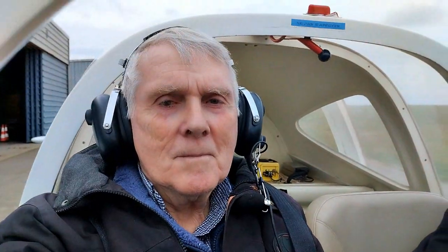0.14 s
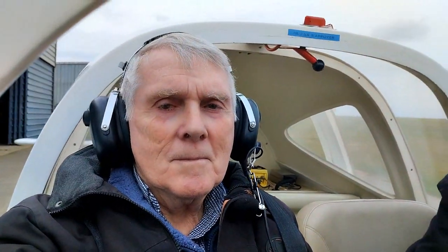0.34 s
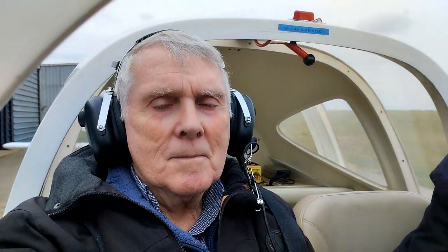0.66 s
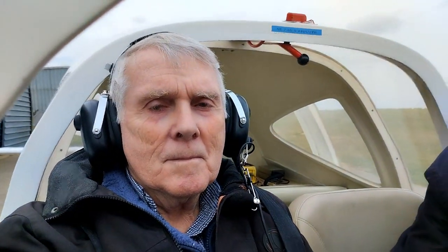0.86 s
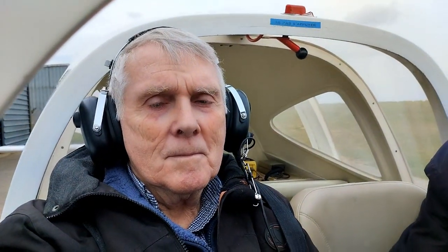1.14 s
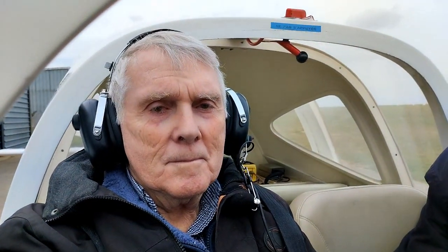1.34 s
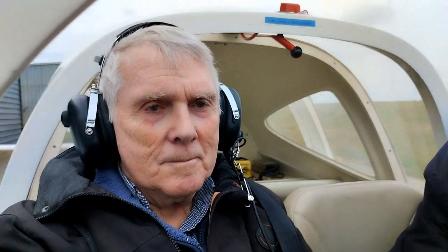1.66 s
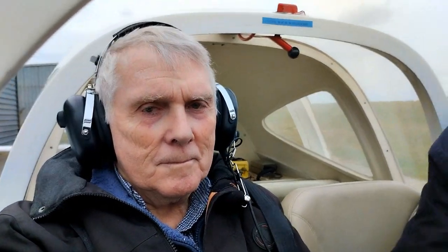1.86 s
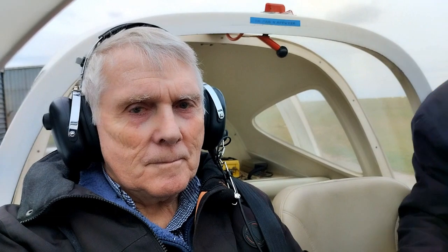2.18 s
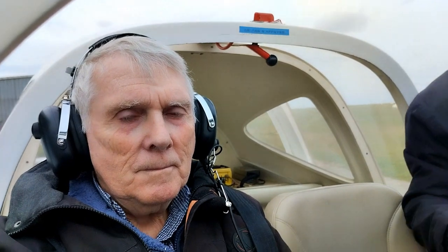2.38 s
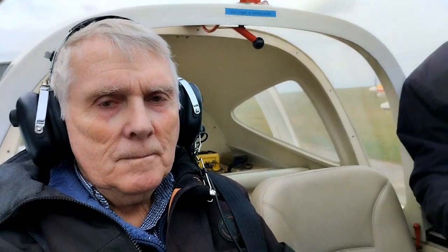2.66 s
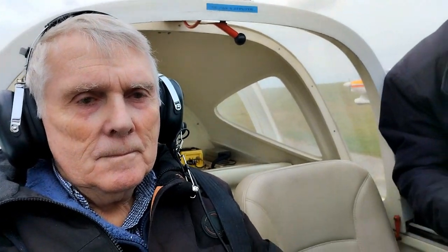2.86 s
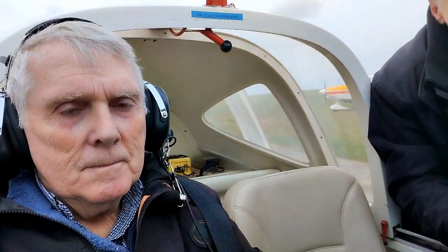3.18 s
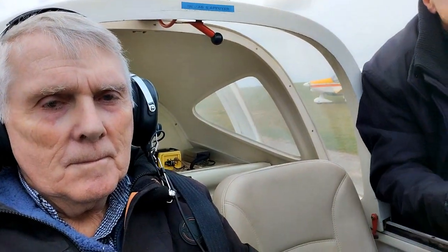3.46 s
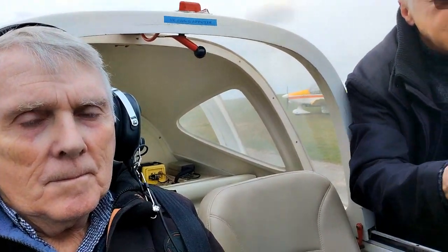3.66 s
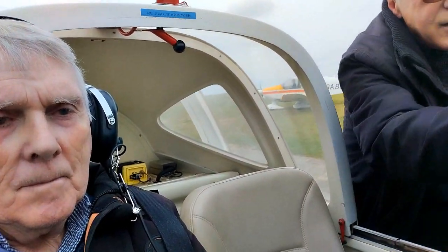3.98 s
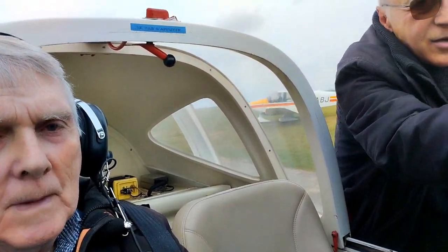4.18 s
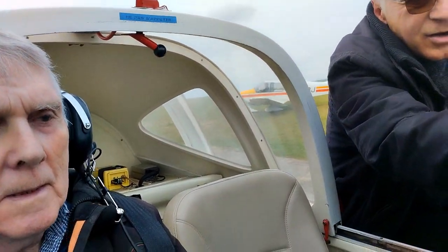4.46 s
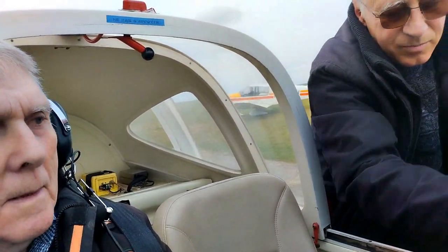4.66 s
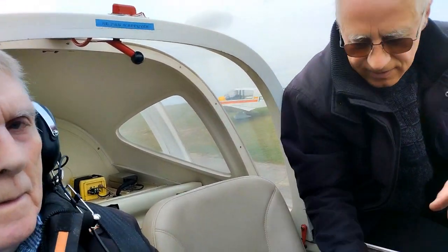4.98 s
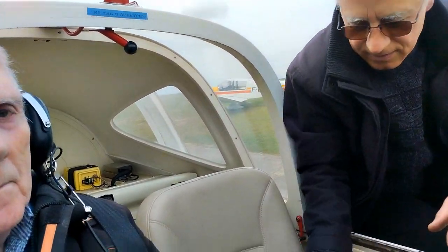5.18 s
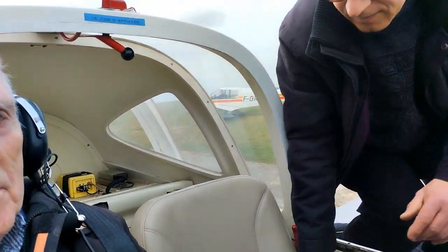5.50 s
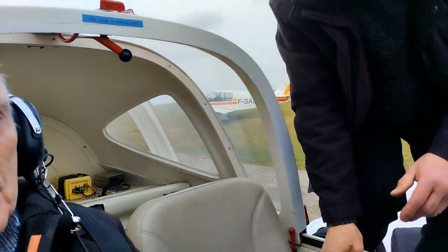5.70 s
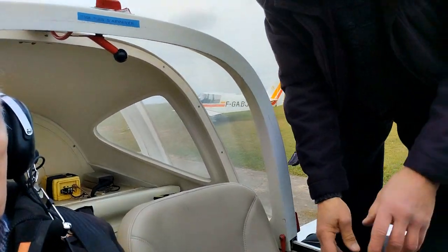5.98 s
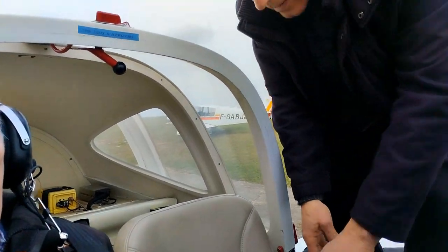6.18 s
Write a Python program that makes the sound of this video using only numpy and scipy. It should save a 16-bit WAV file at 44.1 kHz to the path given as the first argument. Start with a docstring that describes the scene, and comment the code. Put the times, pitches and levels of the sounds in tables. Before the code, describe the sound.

A handheld microphone in a parked aircraft's open cabin hears a deep fluttering engine idle, slightly fuller as it turns toward the opening. Fittings tick and chirp, a jacket brushes past, then a short run of massive thumps, cracks and rough scraping overloads the input. After a brief settling groan, light clicks and nylon rubbing continue over the engine, which revs up at the close.

```python
"""A four-cylinder propeller engine idles on an apron, heard from the open cockpit, and revs up at the end:
firing-order tones, filtered chuffs and throbbing noise. Fittings tick (noise bursts) and squeak (short tones),
the knocked cabin frame rings in decaying modes and nylon jackets swish close by as bright noise.
Something heavy slides and bangs on the frame, jolting rail resonances over a rumble,
until the microphone overloads and clips."""
import sys
import numpy as np
from scipy import signal
from scipy.fft import rfft, irfft, next_fast_len
from scipy.io import wavfile

SR = 44100
rng = np.random.default_rng(int(sys.argv[2]) if len(sys.argv) > 2 else 0)


def inscribe(sig):
    """Save sig as 16-bit PCM at rate SR to the path in sys.argv[1].

    A 1-D sig is mono; a 2-D sig holds one channel per row.
    Samples are clipped to [-1, 1] before scaling.
    """
    pcm = np.round(np.clip(np.atleast_2d(sig).T, -1, 1) * 32767)
    wavfile.write(sys.argv[1], SR, pcm.astype(np.int16))


N = 279594
TIME = np.arange(N) / SR

# Bright noise of rubbing nylon, also the grit of the slide. Each row: frequency in Hz, relative density in dB.
CLOTH_COLOUR = [(1500, -16), (3000, -9), (4500, -6.5), (7900, 2.5), (10500, -3), (13000, -9.5),
                (16000, -14)]


def from_db(db):
    """Decibels to gain."""
    return 10 ** (np.asarray(db) / 20)


def rms_one(x):
    """Scale to rms 1."""
    return x / np.sqrt(np.mean(x ** 2) + 1e-20)


def in_time(rows):
    """Columns of a breakpoint table joined by straight lines, sample by sample."""
    seconds, *columns = np.transpose(rows)
    return [np.interp(TIME, seconds, column) for column in columns]


def drift(rate):
    """Slow random wander with spread 1: low-passed noise, faster for a higher rate in Hz."""
    step = 40   # samples between the computed points
    r = np.exp(-2 * np.pi * rate * step / SR)
    raw = rng.standard_normal(N // step + 2002)
    slow = signal.lfilter([1], [1, -2 * r, r * r], raw)[2000:]   # drop the filter's run-in
    return np.interp(np.arange(N) / step, np.arange(len(slow)), rms_one(slow))


def colour(x, spectrum):
    """Shape a signal by a (Hz, dB) spectrum, straight over log frequency; rms 1."""
    hz, db = np.transpose(spectrum)
    size = next_fast_len(N)
    grid = np.maximum(np.arange(size // 2 + 1) * SR / size, 1)
    gain = from_db(np.interp(np.log(grid), np.log(hz), db))
    return rms_one(irfft(rfft(x, size) * gain, size)[:N])


def grainy(spectrum, flicker_db, rate):
    """Coloured noise whose loudness flickers; rms 1."""
    noise = colour(rng.standard_normal(N), spectrum)
    return rms_one(noise * from_db(flicker_db * drift(rate)))


def narrow(hz, width):
    """Noise in a resonance whose centre may move: two slow noises on a quadrature carrier; rms 1."""
    r = np.exp(-np.pi * width / SR)
    a, b = signal.lfilter([1], [1, -r], rng.standard_normal((2, N)))
    phase = 2 * np.pi * np.cumsum(hz * np.ones(N)) / SR
    return rms_one(a * np.cos(phase) + b * np.sin(phase))


def resonate(x, modes):
    """Parallel resonances (Hz, width Hz, dB) with alternating signs; rms 1."""
    out = 0
    for k, (hz, width, db) in enumerate(modes):
        r = np.exp(-np.pi * width / SR)
        poles = [1, -2 * r * np.cos(2 * np.pi * hz / SR), r * r]
        ringing = (1 - r * r) * signal.lfilter([1, 0, -1], poles, x)
        out = out + (-1) ** k * from_db(db) * ringing
    return rms_one(out)


def swell_db(start, end, growth_db, swell, fade):
    """Level against the start: a swell in dB per s, a hold that grows or sags, a fade in dB per s."""
    hold = growth_db * np.clip((TIME - start) / max(end - start, .001), 0, 1)
    edges = np.minimum(swell * (TIME - start), fade * (end - TIME))
    return hold + np.clip(edges, -120, 0)


def engine_tones(speed, angle, state):
    """Firing orders: tones locked to multiples of the firing phase, weakened where cabin and pipe cancel."""
    # Quarter orders come from unlike cylinders. Each row: order, starting level in dB rms before nulls and drift,
    # dB gained by the microphone turn, by the slide, by revving.
    orders = [(1, -41, 3.5, 1.5, 1), (2, -48, 12.5, 4, 4), (2.25, -44.5, -2.5, -5, 3),
              (2.5, -71, -22, -2, 0), (3, -47.5, 12.5, -4, 10), (4, -41.5, 2, 3, -5),
              (5, -47.5, 4.5, -1, 0.5), (5.25, -70, 12, 1, -5), (6, -43, -1.5, -4, 2.5),
              (7, -47.5, -9, -5, -14), (8.25, -67.5, 17.5, 1.5, -18)]
    # Cabin and pipe cancel orders passing here. Each row: frequency in Hz, half width in Hz, depth in dB.
    nulls = [(37.7, 1.67, 21), (126.3, 7.1, 14), (243, 13.5, 12.5)]
    # The sixth order swells and sinks. Each row: time in seconds, dB added.
    sixth_swell = [(.2, -1), (1.2, 4), (2.9, -3), (3.9, 1.0), (4.3, -3.5), (5.7, 2.5)]
    tones = 0
    for order, *db in orders:
        # phase jumps across the pipe's bass corner and its null near order 4
        lead = 0.9 if order < 1.6 or order > 4.4 else -1.2
        null_db = sum(depth_db * np.exp(-((order * speed - hz) / half_width) ** 2)
                      for hz, half_width, depth_db in nulls)
        level_db = db @ state - null_db + 1.05 * drift(2.7)
        if order == 6:
            level_db = level_db + in_time(sixth_swell)[0]
        tones = tones + np.sqrt(2) * from_db(level_db) * np.cos(order * angle + lead)
    return tones


def exhaust_chuffs(angle):
    """One impulse per firing, alternately strong and weak, sent twice through the exhaust stack; rms 1."""
    # Exhaust stack resonances. Each row: frequency in Hz, width in Hz, relative level in dB.
    stack = [(480, 130, -4), (565, 140, 0)]
    fired = np.diff(np.floor((angle - .1) / (2 * np.pi)), prepend=0) > 0
    strength = from_db(2.5 * np.cos(angle / 2) + 1.5 * drift(30))
    impulses = fired * strength + 1e-18   # the offset keeps the filters off vanishing numbers
    return resonate(resonate(impulses, stack), stack)


def engine_noise(angle, state):
    """Rasp, cowling resonances and cooling-air hiss: noises that throb with each firing."""
    # Broad rasp. Each row: frequency in Hz, relative density in dB.
    rasp_colour = [(25, 5.5), (60, 3), (130, 0), (250, 5), (330, -9.5), (450, -1.5), (560, -12), (680, -10),
                   (850, -15.5), (1200, -18), (1600, -17), (2300, -21.5), (2750, -36), (4000, -67),
                   (9000, -70)]
    # Cooling-air hiss. Each row: frequency in Hz, relative density in dB.
    hiss_colour = [(1500, -15), (3500, -2.5), (5500, -3.5), (8200, 2.5), (10500, -5.5), (13000, -11.5),
                   (16000, -18)]
    # Level of that hiss. Each row: time in seconds, level in dB.
    hiss_level = [(0, -51), (1.0, -50), (2.0, -49), (2.8, -51.5), (3.1, -49), (3.85, -59), (4.0, -48.5),
                  (4.4, -48), (5.1, -49.5), (5.7, -48.5), (5.9, -58)]
    # Cowling and cabin resonances. Each row: frequency in Hz, width in Hz, relative level in dB.
    cowling_modes = [(455, 150, -13.5), (511, 43, -1), (1026, 140, -15), (1437, 27, -9), (2760, 68, -17.5),
                     (3880, 33, -18)]
    # dB at first, dB gained by the turn, by the slide, by revving
    rasp_db, cowling_db = (-44, 2, 2.5, 5), (-56, 2.5, 1, 4.5)
    throb = np.cos(angle - .9)
    uneven = from_db(0.13 * np.cos(angle / 2) + 0.48 * drift(23))   # cylinders fire strong and weak

    def throbbing(depth_db):
        return rng.standard_normal(N) * from_db(depth_db * throb) * uneven

    rasp = colour(throbbing(0.35), rasp_colour)
    cowling = resonate(throbbing(4.3), cowling_modes)
    hiss = colour(throbbing(1.65), hiss_colour)
    return (from_db(rasp_db @ state) * rasp + from_db(cowling_db @ state) * cowling
            + from_db(in_time(hiss_level)[0]) * hiss)


def engine_whirrs(angle):
    """A gliding narrow whirr that throbs with the firings and a steadier whine above it, as narrow noise."""
    # Gliding whirr. Each row: time in seconds, centre in Hz, level in dB before the throb.
    whirr_glide = [(0, 1720, -60), (.6, 1820, -66.5), (1.2, 1559, -65), (2.1, 1589, -56), (2.9, 1696, -60),
                   (3.2, 1745, -51.5), (3.5, 1798, -57), (4.2, 1531, -60), (5.2, 1488, -63),
                   (5.32, 1478, -47), (5.55, 1480, -59), (5.75, 1441, -52), (5.85, 1456, -44),
                   (6.05, 1508, -51), (6.34, 1545, -50)]
    # Fainter whine above it. Each row: time in seconds, centre in Hz, level in dB.
    whine_glide = [(0, 2660, -70), (.7, 2636, -68), (1.5, 2800, -67), (2.3, 2880, -59), (3.0, 2830, -95),
                   (4.4, 2970, -80), (6.34, 2795, -63)]
    whirr_hz, whirr_db = in_time(whirr_glide)
    whine_hz, whine_db = in_time(whine_glide)
    whirr = from_db(whirr_db + 1.9 * np.cos(angle - .9)) * narrow(whirr_hz, width=80)
    return whirr + from_db(whine_db) * narrow(whine_hz, width=130)


def engine():
    """One firing phase drives the order tones, the chuffs, the noises and the whirr."""
    # Engine speed. Each row: time in seconds, firings per second.
    speed_curve = [(0.0, 31.72), (1.1, 31.92), (2.2, 32.08), (4.3, 32.22), (5.2, 32.48), (5.6, 32.42),
                   (5.72, 33.0), (5.88, 34.7), (6.09, 37.9), (6.25, 40.1), (6.34, 41.2)]
    # The microphone turns toward the open side of the cockpit. Each row: time in seconds, share of the turn 0-1.
    mic_turn = [(0, 0), (.7, 0.07), (1.6, 0.48), (2.5, 0.6), (3.4, 1), (4.3, 0.99)]
    moved_s, move_takes_s = 4.93, 0.38   # the slide changes what stands between engine and microphone
    idle_top_per_s, rev_rise_per_s = 32.6, 1.4   # revving starts above this firing rate, full this much higher
    chuff_db = (-60, 6, 9, -3)   # dB at first, dB gained by the turn, by the slide, by revving
    speed, = in_time(speed_curve)
    angle = 2 * np.pi * np.cumsum(speed) / SR - 1.64 + .03 * drift(4)   # one turn per firing
    moved = (TIME - moved_s) / move_takes_s
    revving = (speed - idle_top_per_s) / rev_rise_per_s
    # a row of four levels times this gives dB in time
    state = np.clip([np.ones(N), in_time(mic_turn)[0], moved, revving], 0, 1)
    chuffs = from_db(chuff_db @ state) * exhaust_chuffs(angle)
    return engine_tones(speed, angle, state) + chuffs + engine_noise(angle, state) + engine_whirrs(angle)


def cracks():
    """Ticks and cracks: bursts of bright noise with a duller body and a thin edge, sudden and dying fast."""
    # Each row: start in seconds, bright noise in dB, dull body in dB, thin edge in dB (both against the noise).
    hits = [(0.376, -49, -25, 5.5), (1.346, -44, 6, -25), (1.5944, -44, -15, -23), (1.9095, -34, -12, -6),
            (1.9442, -38.5, 0.5, -24), (2.031, -29, -5.5, -17), (2.042, -30.5, -5, -4),
            (2.978, -53, -15, -20), (3.59, -55, 11.5, -20), (3.621, -44, 2, -20), (3.649, -36, -20, -6),
            (4.4324, -56.5, 18, -14), (4.4631, -16, 5, -35), (4.5242, -20.5, 0.5, -2.5),
            (4.7347, -21, -10, 4), (4.757, -34, -12, -10), (4.8024, -36, -8, -9), (4.821, -34.5, -20, 2),
            (4.8426, -11.5, -9, -13), (4.8734, -18, 0.5, -4), (4.895, -23, -22, -6),
            (4.9235, -29.5, -20, -25), (5.0105, -48, -18, -21), (5.2241, -50.5, 12, -17),
            (5.2785, -52.5, 15.5, -18), (5.3587, -35, -22, -9), (5.3844, -34, 0, 1.5),
            (5.438, -40, -15, -17), (5.4962, -43, -23.5, 3.5), (5.5446, -48.5, -17, 6.5),
            (5.558, -46, -13, -23), (5.6325, -36, -2, -24), (5.723, -39.5, 8.5, -11),
            (5.802, -35.5, 7.5, 1), (5.8407, -30.5, -11, -16), (5.9135, -53, 17, -18),
            (6.0514, -41, -9, 3.5), (6.1814, -34, -2, -5), (6.274, -33.5, -17, -23)]
    # Bright noise, dull body, thin edge. Each row: frequency in Hz, relative density in dB.
    bright_colour = [(800, -3.5), (2000, 6.5), (3500, -7), (8000, 1.5), (10500, -4.5), (12500, -57)]
    body_colour = [(200, -15), (450, 6.5), (1000, -2), (1600, -29), (3000, -39)]
    edge_colour = [(9000, 3), (11500, 5.5), (16000, -14.5)]
    bright_t60_s, body_t60_s, edge_t60_s = 0.062, 0.11, 0.07   # for a crack at -25 dB
    shorter_per_db = 0.0071   # harder cracks die a little faster
    bright, dull, thin = np.zeros((3, N))
    for start, db, body_db, edge_db in hits:
        now = slice(round(start * SR), round(start * SR) + SR // 3)
        fall_db = 60 * (TIME[now] - start) * np.exp(shorter_per_db * (db + 25))
        bright[now] += from_db(db - fall_db / bright_t60_s)
        dull[now] += from_db(db + body_db - fall_db / body_t60_s)
        thin[now] += from_db(db + edge_db - fall_db / edge_t60_s)
    layers = [(bright, bright_colour), (dull, body_colour), (thin, edge_colour)]
    return sum(level * colour(rng.standard_normal(N), shade) for level, shade in layers)


def bumps():
    """Low bumps on the frame: each rings all its modes as decaying sines; a harder one lifts the high modes."""
    # Each row: start in seconds, level in dB, T60 in seconds, hardness in dB per decade above 100 Hz.
    knocks = [(1.345, -32, 0.097, 0), (1.912, -31, 0.22, 1), (2.04, -24, 0.36, 3.5),
              (4.465, -9.5, .07, 13.5), (4.476, 2, 0.11, -18), (4.539, -33, .14, -10),
              (4.728, -.5, 0.15, -16), (4.845, -7, 0.18, 5), (4.858, 1.5, 0.077, -20),
              (4.897, -9.5, 0.5, -3.5), (5.796, -29.5, 0.56, 4.5)]
    # Modes of the cabin frame. Each row: frequency in Hz, relative level in dB, share of the bump's T60.
    frame_modes = [(61.6, -15, 1), (100, 2, 0.55), (119.8, 3.5, 0.46), (208, 2, 0.62), (360, -8, 0.34),
                   (640, -25, 0.12), (1424, -16, 0.46), (2098, -16, 0.26)]
    out, after = np.zeros(N), TIME[:SR // 2]
    for start, db, t60, hard_db in knocks:
        ring = 0
        for hz, mode_db, share in frame_modes:
            strike_db = mode_db + hard_db * np.log10(hz / 100) + 1.8 * rng.normal()
            fall_db = 60 * after / (t60 * share)
            ring = ring + from_db(strike_db - fall_db) * np.sin(2 * np.pi * hz * after)
        first = round(start * SR)
        out[first:first + len(after)] += from_db(db) * ring
    return out


def squeaks():
    """Brief tones roughened by a waver in pitch and level: squeaks of fittings, near 2.05 s a tick's short ring."""
    # Each row: centre in seconds, pitch in Hz before the waver, level in dB before the flicker, length in seconds.
    chirps = [(1.688, 2160, -40, .012), (1.756, 2250, -39.5, 0.015), (1.851, 2290, -39, .01),
              (1.862, 2240, -39.5, .014), (1.88, 2260, -45, 0.024), (1.939, 1250, -39, 0.02),
              (1.969, 2230, -45, .015), (2.051, 2150, -24.5, 0.013), (2.047, 1580, -33, 0.016),
              (2.097, 2260, -42, .012), (2.291, 2880, -49, .056), (2.3, 3300, -50, 0.068),
              (5.863, 5970, -35.5, 0.06), (5.858, 14660, -32, 0.043)]
    out, waver = np.zeros(N), np.cumsum(drift(62)) / SR
    for centre, hz, db, length in chirps:
        shape = np.exp(-2 * ((TIME - centre) / (length / 2)) ** 2)
        out += from_db(db) * shape * np.sin(2 * np.pi * (hz * TIME + 30 * waver))   # pitch wavers by 30 Hz
    return out * from_db(3.6 * drift(76))


def jackets():
    """Nylon rubbing on nylon: bright noise under each stroke; the early swish also rings in a few narrow bands."""
    # Each row: start in seconds, end in seconds, level at the start in dB, growth in dB, fade in dB per second.
    strokes = [(3.175, 3.3, -46, 3.5, 100), (3.2, 3.223, -41.5, 0, 200), (3.3, 3.37, -44, 4, 31),
               (3.55, 3.745, -45.5, -2.5, 496), (5.34, 5.382, -50.5, 10, 300),
               (5.442, 5.482, -42.5, 5.5, 1000), (5.779, 5.866, -42.5, 8, 135),
               (5.959, 6.09, -39, -0.5, 202), (6.116, 6.177, -38, 7.5, 376), (6.2, 6.27, -38, -5, 300),
               (6.278, 6.279, -35.5, 3, 500), (6.287, 6.32, -41, 1.5, 150)]
    # Ringing bands in the first swish. Each row: frequency in Hz, width in Hz, level in dB, centre in seconds.
    swish_bands = [(4470, 110, -49, 3.27), (7090, 200, -50, 3.3), (6620, 100, -52, 3.3),
                   (5200, 300, -55, 3.36), (8140, 120, -49, 3.45), (3950, 140, -54.5, 3.5),
                   (3500, 160, -56, 3.48), (5900, 400, -50, 3.35), (7480, 90, -52, 3.5),
                   (9210, 100, -54, 3.5)]
    stroke_swell_db_per_s = 298
    band_lasts_s, bands_ring_s = 0.7, (3.18, 4.1)   # width of each band's swell; span of the swish
    cloth = grainy(CLOTH_COLOUR, flicker_db=1.5, rate=83)
    stroke_db = np.max([db + swell_db(start, end, growth, stroke_swell_db_per_s, fade)
                        for start, end, db, growth, fade in strokes], axis=0)
    bands = 0
    for hz, width, db, centre in swish_bands:
        shape = np.exp(-2 * ((TIME - centre) / (band_lasts_s / 2)) ** 2)
        bands = bands + from_db(db) * shape * narrow(hz, width)
    span_db = swell_db(*bands_ring_s, growth_db=0, swell=300, fade=300)
    return from_db(stroke_db) * cloth + from_db(span_db) * bands


def slide():
    """Rough contact: dense uneven jolts ring low and high rail modes over a lumpy rumble, with grit and a groan."""
    # Shoves of the heavy slide. Each row: start in seconds, end in seconds, rumble in dB, scrape in dB,
    # grit in dB, growth in dB, fade in dB per second.
    shoves = [(4.464, 4.503, -11, -34, -53, -2, 298), (4.492, 4.533, -12, -26.5, -41, -0.5, 248),
              (4.55, 4.603, -15, -33, -50, -4.5, 300), (4.598, 4.726, -16.5, -28, -42.5, 6.5, 298),
              (4.755, 4.779, -14.5, -23.5, -33.5, -2, 300), (4.8, 4.833, -20.5, -38, -33.5, -1.5, 300),
              (4.843, 4.882, -7.5, -21.5, -35, -2, 255), (4.897, 4.911, -15, -27, -43, -2, 197),
              (4.967, 5.042, -33, -48.5, -50.5, 3, 297)]
    # What the slide rings. Each row: frequency in Hz, width in Hz, relative level in dB.
    rail_modes = [(106.6, 42, 0), (191.8, 24, 1), (333, 29.6, -3.5), (498, 77, -10.5), (606, 8.9, -12),
                  (880, 200, -6), (1173, 110, -2), (1203, 150, -3.5), (1542, 89, -4.5), (1750, 62, -7.5),
                  (2150, 140, -13), (2270, 88, -14.5), (2850, 380, -20), (3380, 420, -26),
                  (4500, 1400, -44)]
    # Lumpy low noise. Each row: frequency in Hz, relative density in dB.
    rumble_colour = [(24, -37), (40, 2.5), (102, -0.5), (286, -12), (475, -19), (521, -65), (593, -6),
                     (900, -31), (1170, -56), (1980, -120)]
    # A groan as the slide settles. Each row: time in seconds, centre in Hz, level in dB.
    groan_glide = [(4.94, 620, -50), (4.975, 545, -33), (5.02, 505, -30), (5.045, 485, -33),
                   (5.065, 440, -50)]
    shove_swell_db_per_s, jolts_per_s = 12000, 900
    rumble_db, scrape_db, grit_db = np.max(
        [np.c_[db] + swell_db(start, end, growth, shove_swell_db_per_s, fade)
         for start, end, *db, growth, fade in shoves], axis=0)
    force = from_db(2.2 * np.minimum(rng.exponential(1, N), 4))
    jolts = (rng.random(N) < jolts_per_s / SR) * force * rng.choice([-1, 1], N)
    lumps = grainy(rumble_colour, flicker_db=2.2, rate=30)
    rumble = from_db(-4) * lumps + from_db(-2.6) * resonate(jolts, rail_modes[:5])   # five low modes
    scrape = resonate(jolts, rail_modes[5:])
    grit = grainy(CLOTH_COLOUR, flicker_db=2.5, rate=95)
    groan_hz, groan_db = in_time(groan_glide)
    groaning = (TIME > groan_glide[0][0]) * (TIME < groan_glide[-1][0])
    groan = from_db(groan_db) * groaning * narrow(groan_hz, width=45)
    return from_db(rumble_db) * rumble + from_db(scrape_db) * scrape + from_db(grit_db) * grit + groan


def scene():
    """All sources at one microphone."""
    return (engine() + cracks() + bumps() + squeaks() + jackets() + slide())[None]


def record(dry):
    """The input overloads flat at full scale; a steep low-pass cuts the top."""
    cutoff_hz = 16100
    low_pass = signal.ellip(13, .1, 75, cutoff_hz, fs=SR, output="sos")
    return signal.sosfilt(low_pass, np.clip(dry, -1, 1))


dry = scene()
out = record(dry)
inscribe(out)
```